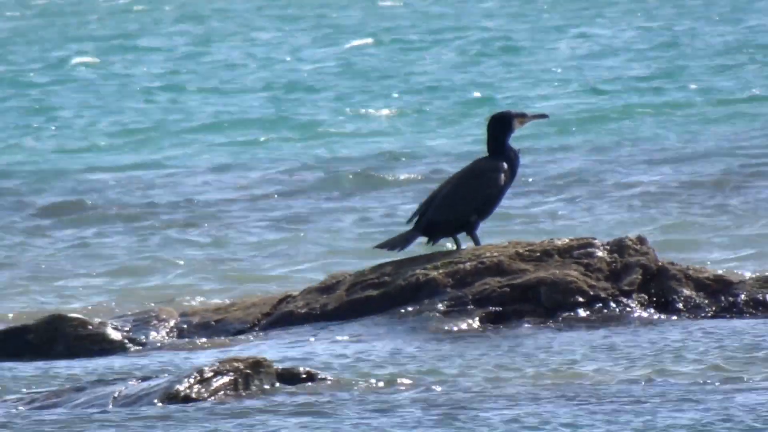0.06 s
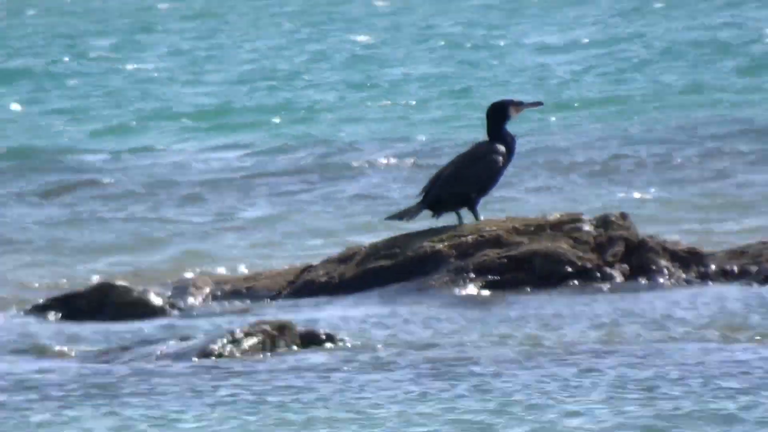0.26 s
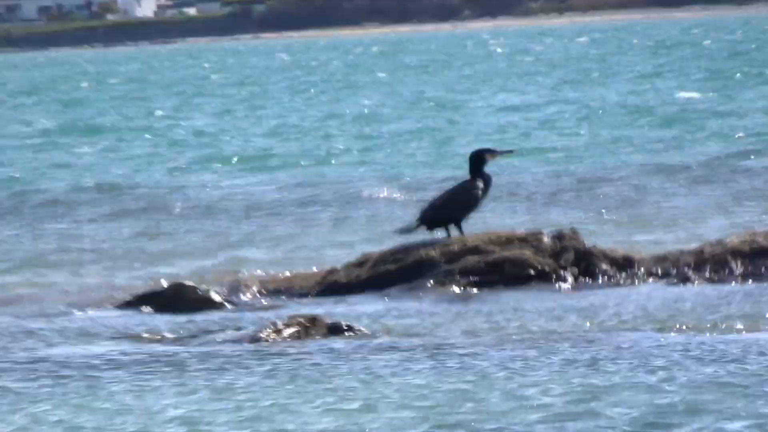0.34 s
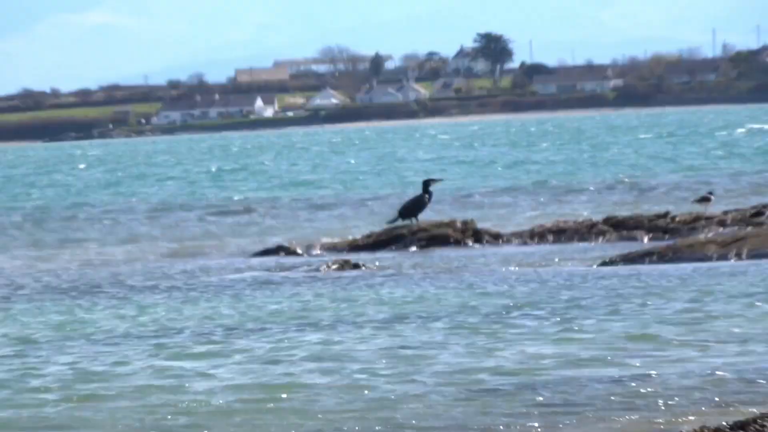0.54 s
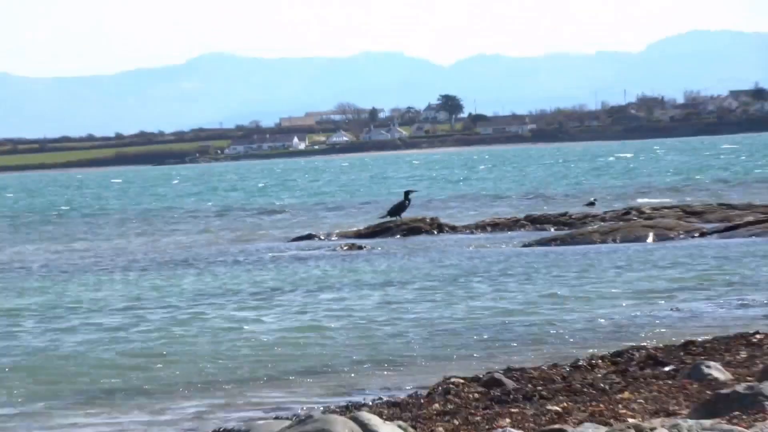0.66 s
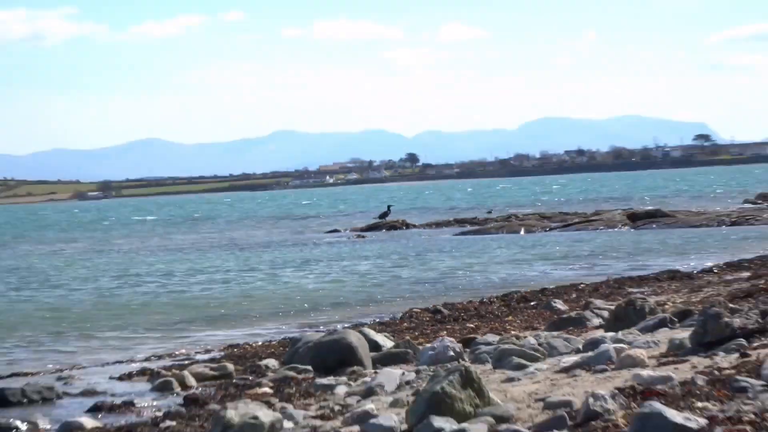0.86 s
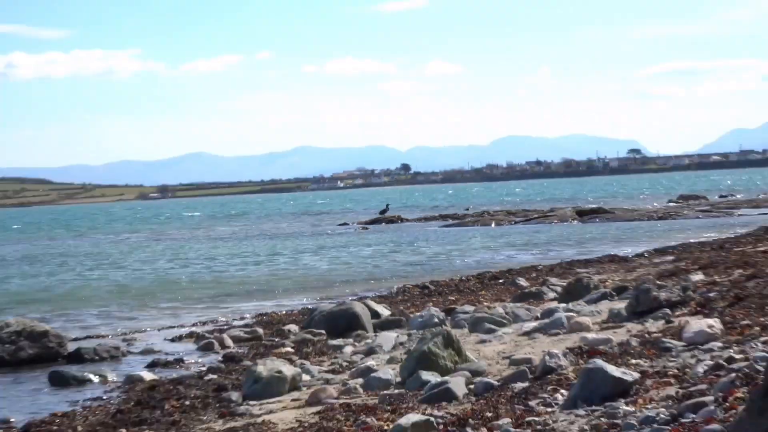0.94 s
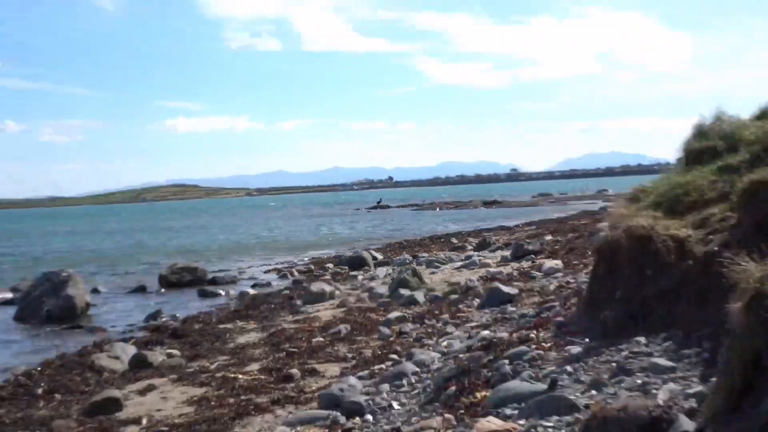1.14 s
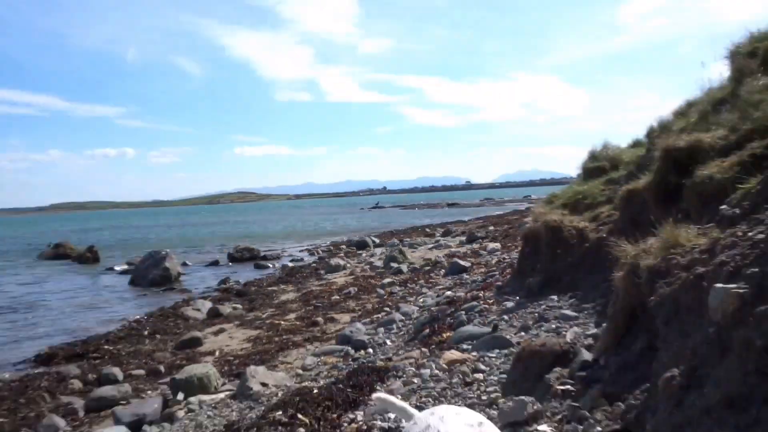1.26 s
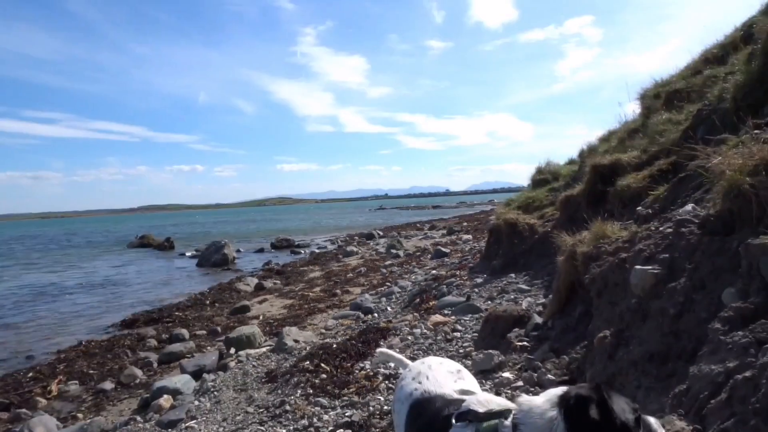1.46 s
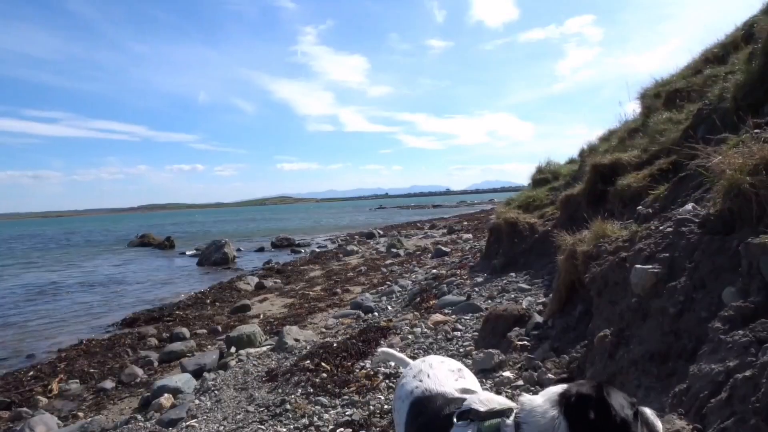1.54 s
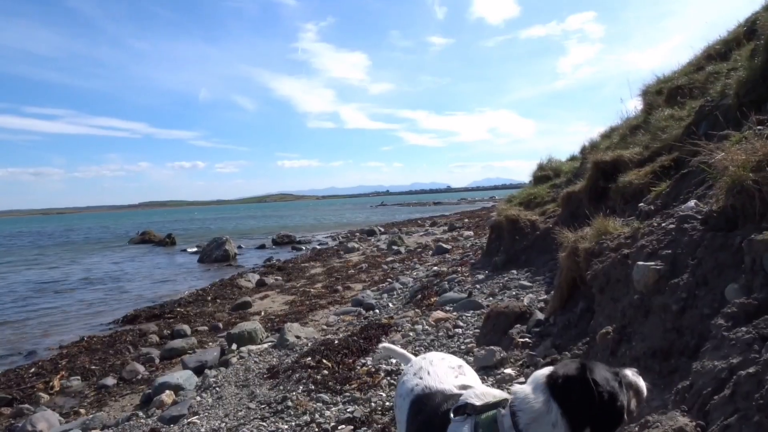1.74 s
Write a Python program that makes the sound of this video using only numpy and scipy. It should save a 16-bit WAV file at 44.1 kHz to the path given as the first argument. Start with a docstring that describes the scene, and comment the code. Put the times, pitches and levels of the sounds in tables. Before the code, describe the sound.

A small camera zoom motor whirrs steadily, stops dead, and a few clicks follow.

```python
"""Soft finger bumps on a camera, over a faint shore wash; then its zoom motor spins up, whirrs for 1.4 s
and stops dead. A few clicks follow. The shaft whines, the gear teeth rasp twice a turn, and from halfway
a loose gear ticks once a turn. All three are heard through the casing, which rings near 6 kHz, and are
louder in the left of two microphones."""
import sys
import numpy as np
from scipy import signal
from scipy.fft import rfft, irfft
from scipy.io import wavfile
from scipy.ndimage import uniform_filter1d

SR = 44100
rng = np.random.default_rng(int(sys.argv[2]) if len(sys.argv) > 2 else 0)


def put_to_file(sound):
    """Save the sound as 16-bit audio at rate SR, in the file named by the first command-line argument."""
    columns = np.atleast_2d(sound).T  # one column per channel
    safe = np.clip(columns, -1, 1)
    whole_steps = np.round(safe * 32767)
    wavfile.write(sys.argv[1], SR, whole_steps.astype(np.int16))


N = 79380
T = np.arange(N) / SR

# Spectra of the shore, finger bumps and clicks. Each row: frequency in Hz, relative level in dB.
SHORE_SPECTRUM = [(40, -17), (100, -17), (350, -18), (480, 4.5), (600, 2), (850, 5), (1200, 5), (2000, -4),
                  (2800, -4), (5000, -12), (11000, -15)]
BUMP_BODY = [(30, -39.5), (70, -15.5), (150, -2), (230, -5), (400, -13), (700, -60), (2000, -93)]
CLICK_BODY = [(150, -13), (600, -15), (1300, -17), (3000, -2), (4800, -1), (6500, -4), (8000, -3),
              (9500, -3), (11000, -17)]
# Finger bumps; lever and casing clicks. Each row: start in seconds, level in dB, decay in seconds.
BUMPS = [(.005, -60.5, 0.053), (.075, -50.5, .02), (.1, -46, 0.032), (.153, -54, 0.014), (.196, -33, 0.013),
         (.335, -59.5, 0.042), (.415, -62, 0.069), (.492, -50, 0.014), (.52, -44, .014), (.6, -61, 0.037),
         (1.335, -57.5, 0.014), (1.583, -57, 0.0053), (1.729, -43, 0.0056)]
CLICKS = [(.214, -18, 0.00084), (1.7562, -36.5, .002), (1.764, -40, 0.017), (1.777, -17.5, 0.0012),
          (1.7835, -27.5, 0.0034), (1.79, -44, 0.0013)]
# Shaft speed. Each row: time in seconds, turns per second.
SHAFT_HZ = [(.19, 44.85), (.22, 137.2), (.24, 199.5), (.26, 234.3), (.286, 247.3), (.32, 228.4),
            (.365, 219.5), (.44, 227.3), (.55, 224.6), (.8, 224.5), (.87, 224.1), (1.0, 226.4),
            (1.05, 222.9), (1.17, 225.5), (1.38, 224), (1.48, 229.7), (1.54, 228.2), (1.58, 170)]
# Shaft harmonics. Each row: multiple of shaft speed, level in dB with gears tight, level in dB when slack.
HARMONICS = [(2, -65, -73), (3, -44, -49.5), (4, -53.5, -47), (5, -58.5, -57), (6, -46.5, -58),
             (7, -54.5, -52.5), (8, -57.5, -73), (9, -54, -47.5), (10, -49.5, -93), (11, -86, -77),
             (12, -47.5, -53.5), (13, -42, -49.5), (14, -51, -54), (15, -70, -46), (16, -42.5, -50),
             (17, -58, -46), (18, -45.5, -79.5), (19, -55.5, -47), (22, -48, -60.5), (23, -51.5, -64),
             (24, -54, -60), (25, -48.5, -58.5), (26, -39, -50), (27, -41, -51.5), (28, -54, -47),
             (29, -34, -47.5), (31, -41, -52), (32, -50.5, -54), (36, -44, -62), (42, -51, -55),
             (44, -48, -44), (48, -42, -54)]
# Gear-train slack. Each row: time in seconds, slack from 0 (tight) to 1.
SLACK = [(.8, 0), (.87, 0.98), (1.41, 0.96), (1.46, 0.21), (1.55, 0.25)]
# Mesh whine, tooth pressure and loose-gear strikes. Each row: time in seconds, gain in dB.
MESH_DB = [(.2, -16), (.25, -1), (.3, -4), (.4, 1), (.5, -4.5), (.65, 3), (.79, 1.5), (.86, -2),
           (1.1, -2.5), (1.42, -3), (1.463, 5.5), (1.485, -3), (1.515, 7.5), (1.545, 0.5)]
LOAD_DB = [(.18, -26.5), (.212, -4), (.246, 5), (.312, -5), (.34, 3), (.43, 3.5), (.47, 1), (.56, 1),
           (.7, 0), (.78, 4.5), (.85, -3), (.97, -6), (1.01, -1), (1.3, 2), (1.43, -3.5), (1.465, 3),
           (1.485, -2), (1.52, 1.5), (1.55, -0.5), (1.565, -15)]
LOOSE_DB = [(.2, -38), (.7, -15), (.8, 1.5), (.86, 3), (.96, 3.5), (1.0, 2), (1.1, 3), (1.25, 0.5),
            (1.36, 4), (1.43, 3), (1.5, -0.5), (1.548, 2.5), (1.56, -51)]
# Casing as rung by the teeth and by the loose gear. Each row: frequency in Hz, relative gain in dB.
RASP_BODY = [(200, -88), (340, -49.5), (430, -28.5), (540, -19.5), (1700, -19.5), (2900, -12.5),
             (4000, -14), (4450, -11.5), (5000, -11), (5600, -14), (6150, 6.5), (6700, -8.5), (7700, -18),
             (8100, -10.5), (8700, -18.5), (9600, -16), (11000, -14)]
TICK_BODY = [(280, -73), (450, -63), (650, -20.5), (1600, -28.5), (3300, -29), (3800, -10.5), (4300, -34.5),
             (5600, -7), (6250, 2.5), (6650, -7), (8100, -13.5), (8550, -20.5), (9900, -8.5), (11000, -10)]
# Motor balance at the microphones. Each row: frequency in Hz, left minus right in dB.
BALANCE_DB = [(400, -3), (700, 9.5), (1500, 3.5), (2300, 5), (3000, 11.5), (3900, 13), (4500, 3.5),
              (5300, 3.5), (6200, 12), (8000, 10.5), (8700, 4), (10500, 15)]

START_S, STOP_S, RUN_HZ, SPEED_WOBBLE = 0.19, 1.548, 224.5, .0015
WHINE_RISE_S, WHINE_DECAY_S, FLICKER_DB, LOWEST_MESH_ORDER = 0.016, 0.0032, 3, 9
GEAR_RISE_S, GEAR_DECAY_S = 0.0076, 0.016
RASP_DB, CONTACTS_PER_S, CONTACT_SCATTER_DB = -25.5, 8300, 1.5
TICK_DB, TICK_SCATTER_DB, TICK_JITTER_S = -24, 0.5, .00012
SCRAPE_DB, SCRAPE_DECAY_S = 4.5, 0.0012
BOUNCE_DB, BOUNCE_SCATTER_DB, BOUNCE_TURNS = -12, 4, .5
MIC_LAG_S, GEAR_COHERENCE = .00007, 0.13


def undb(db):
    """Decibels to gain."""
    return 10 ** (np.asarray(db) / 20)


def unit(x):
    """Scale to rms 1."""
    return x / np.sqrt(np.mean(x ** 2))


def curve(points):
    """Join (s, value) points by straight lines."""
    return np.interp(T, *np.array(points).T)


def at_hz(points, hz):
    """Read (Hz, dB) points on a log-frequency axis."""
    knots_hz, db = np.array(points, float).T
    return np.interp(np.log(np.maximum(hz, 1)), np.log(knots_hz), db)


def wander(rate_hz):
    """Smooth random drift, spread near 1."""
    hold = int(SR / rate_hz)
    steps = np.repeat(rng.standard_normal(N // hold + 1), hold)
    return 1.3 * uniform_filter1d(uniform_filter1d(steps, hold), hold)[:N]


def ring(x, body, size=4096):
    """Pass x through a minimum-phase, unit-energy body of (Hz, dB) shape."""
    cepstrum = irfft(np.log(undb(at_hz(body, np.fft.rfftfreq(size, 1 / SR)))))
    cepstrum[1:size // 2] *= 2
    cepstrum[size // 2 + 1:] = 0
    impulse = irfft(np.exp(rfft(cepstrum)))
    return signal.fftconvolve(x, impulse / np.sqrt(np.sum(impulse ** 2)))[:N]


def mic_pair(drives, body, coherence):
    """Two drives ring a body; the microphones share part of the sound, the left slightly later."""
    shared, separate = (ring(drive, body) for drive in drives)
    left = np.pad(shared, (round(MIC_LAG_S * SR), 0))[:N]
    right = coherence * shared + np.sqrt(1 - coherence ** 2) * separate
    return np.array([left, right])


def shore(level_db=-55, swell_db=.4):
    """Faint wash of small waves, its level drifting slightly."""
    wash = mic_pair(rng.standard_normal((2, N)), SHORE_SPECTRUM, coherence=0.57)
    return wash * undb(level_db + swell_db * wander(8.2))


def touches(events, body, rise_s, coherence):
    """Short bursts of contact die away in the camera's body."""
    force = np.zeros(N)
    for start_s, db, decay_s in events:
        attack = np.clip((T - start_s) / rise_s, 0, 1)
        force += undb(db) * attack * np.exp(-np.maximum(T - start_s - rise_s, 0) / decay_s)
    return mic_pair(force * rng.standard_normal((2, N)), body, coherence)


def shaft_whine(shaft_hz, turns):
    """Shaft harmonics shift with gear slack; the upper ones bloom on reaching the casing's resonances."""
    slack, mesh_db = curve(SLACK), curve(MESH_DB)
    tones = np.zeros((2, N))
    for order, tight_db, slack_db in HARMONICS:
        db = tight_db + (slack_db - tight_db) * slack + FLICKER_DB * wander(25)
        if order >= LOWEST_MESH_ORDER:
            casing_db = at_hz(RASP_BODY, order * shaft_hz) - at_hz(RASP_BODY, order * RUN_HZ)
            db += mesh_db + np.minimum(casing_db, 0)
        phase_rad = 2 * np.pi * (order * turns + rng.random())
        left_lag_rad = min(2 * np.pi * order * RUN_HZ * MIC_LAG_S, np.pi / 2)
        tones += undb(db) * np.sqrt(2) * np.sin([phase_rad - left_lag_rad, phase_rad])
    attack = np.clip((T - START_S) / WHINE_RISE_S, 0, 1)
    return tones * attack * np.minimum(shaft_hz / RUN_HZ, 1)


def gear_rasp(turns):
    """Dense tooth contacts, bunched twice a turn, ring the casing."""
    shaft_rad = 2 * np.pi * turns
    bunching = unit(np.exp(0.49 * np.cos(2 * shaft_rad) + 0.051 * np.cos(shaft_rad)))
    hits = rng.random(N) < CONTACTS_PER_S / SR
    contacts = unit(hits * undb(CONTACT_SCATTER_DB * rng.standard_normal(N)))
    force = contacts * bunching * undb(RASP_DB + curve(LOAD_DB))
    return mic_pair(force * rng.choice([-1, 1], (2, N)), RASP_BODY, GEAR_COHERENCE)


def loose_gear_ticks(turns):
    """The loose gear strikes once a turn, scrapes briefly and bounces after a random wait."""
    turn_starts = np.flatnonzero(np.diff(np.floor(turns)))
    turn_samples = np.gradient(turn_starts)
    jitter, strength, wait, rebound = rng.standard_normal((len(turn_starts), 4)).T
    strikes = (TICK_JITTER_S * SR * jitter, TICK_SCATTER_DB * strength)
    bounces = (BOUNCE_TURNS * turn_samples * np.abs(wait), BOUNCE_DB + BOUNCE_SCATTER_DB * rebound)
    blows = np.zeros(N)
    for delay_samples, db in (strikes, bounces):
        blows[np.clip(turn_starts + delay_samples.astype(int), 0, N - 1)] += undb(db)
    scrape = unit(signal.lfilter([1], [1, -np.exp(-1 / (SCRAPE_DECAY_S * SR))], blows))
    force = unit(unit(blows) + undb(SCRAPE_DB) * scrape) * undb(TICK_DB + curve(LOOSE_DB))
    return mic_pair(force * rng.choice([-1, 1], (2, N)), TICK_BODY, GEAR_COHERENCE)


def lean_left(pair):
    """Pan by frequency: all but the lows favour the left microphone."""
    ratio = undb(at_hz(BALANCE_DB, np.fft.rfftfreq(N, 1 / SR)))
    gains = np.array([ratio, np.ones_like(ratio)]) * 2 / (1 + ratio)
    return irfft(rfft(pair) * gains, N)


def zoom_motor():
    """One shaft drives whine, rasp and ticks; the brake stops them together."""
    shaft_hz = curve(SHAFT_HZ) * (1 + SPEED_WOBBLE * wander(40))
    turns = np.cumsum(shaft_hz) / SR
    braked_s = np.maximum(T - STOP_S, 0)
    take_up = np.clip((T - START_S) / GEAR_RISE_S + 1, 0, 1)
    gears = (gear_rasp(turns) + loose_gear_ticks(turns)) * take_up * np.exp(-braked_s / GEAR_DECAY_S)
    whine = shaft_whine(shaft_hz, turns) * np.exp(-braked_s / WHINE_DECAY_S)
    return lean_left(whine + gears)


def scene():
    """Motor and handling over the shore."""
    bumps = touches(BUMPS, BUMP_BODY, rise_s=0.0066, coherence=0.6)
    clicks = touches(CLICKS, CLICK_BODY, rise_s=.00012, coherence=0.17)
    return zoom_motor() + bumps + clicks + shore()


def record(dry):
    """Steep treble cut."""
    cutoff_hz = 10980
    return signal.sosfilt(signal.ellip(14, .2, 70, cutoff_hz, fs=SR, output="sos"), dry)


dry = scene()
out = record(dry)
put_to_file(out)
```